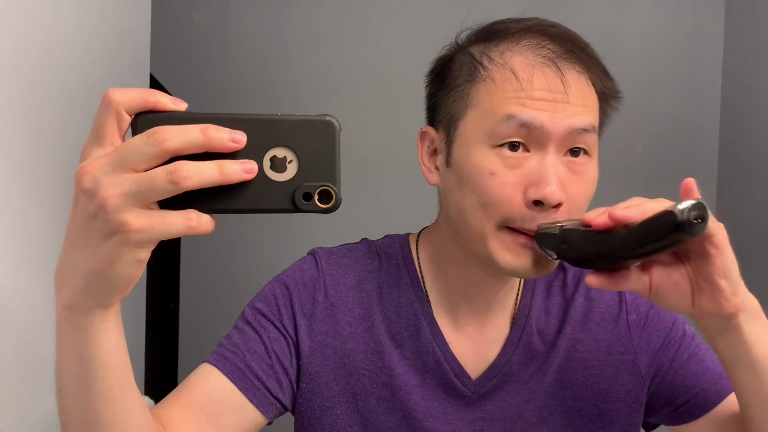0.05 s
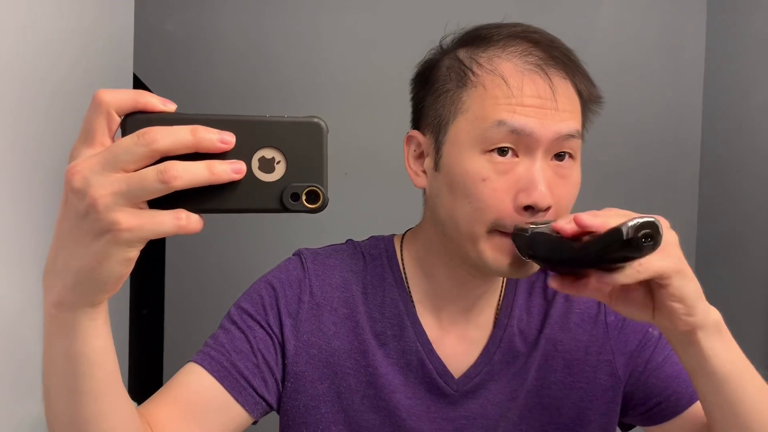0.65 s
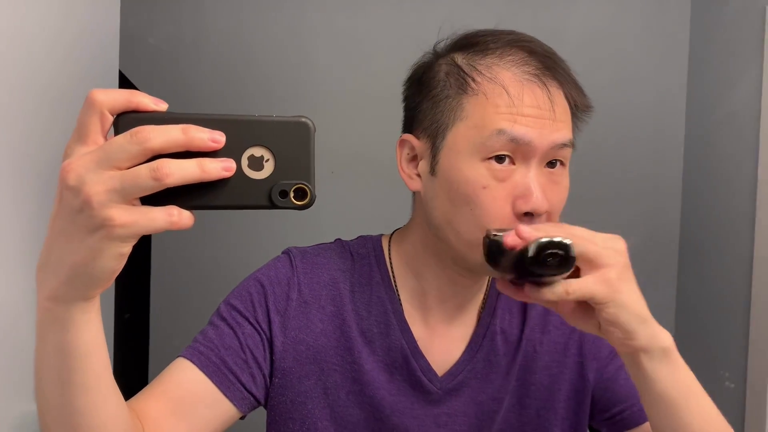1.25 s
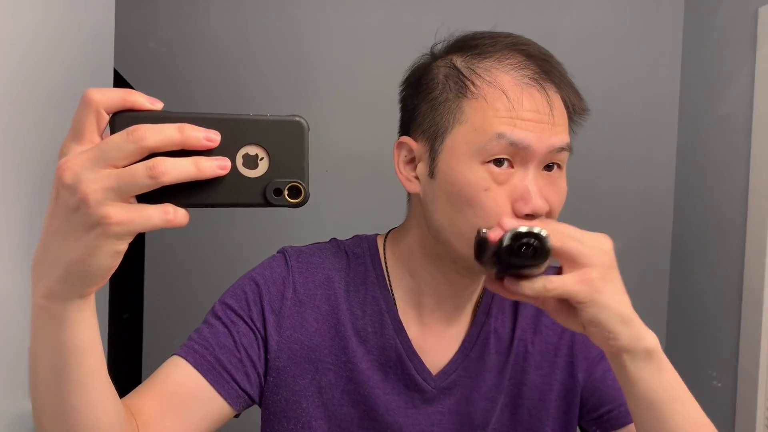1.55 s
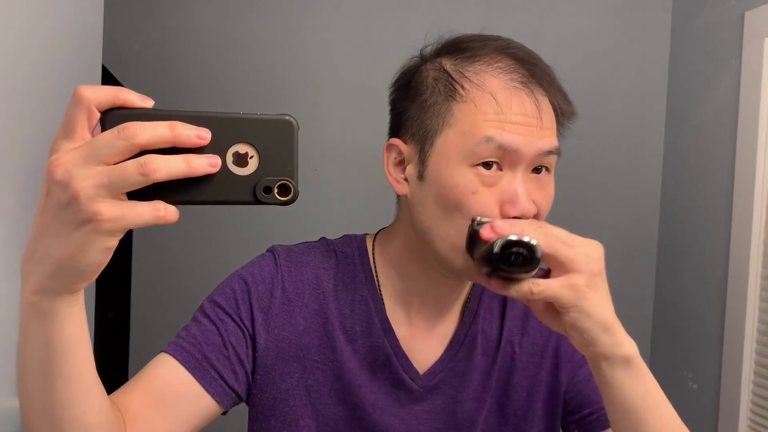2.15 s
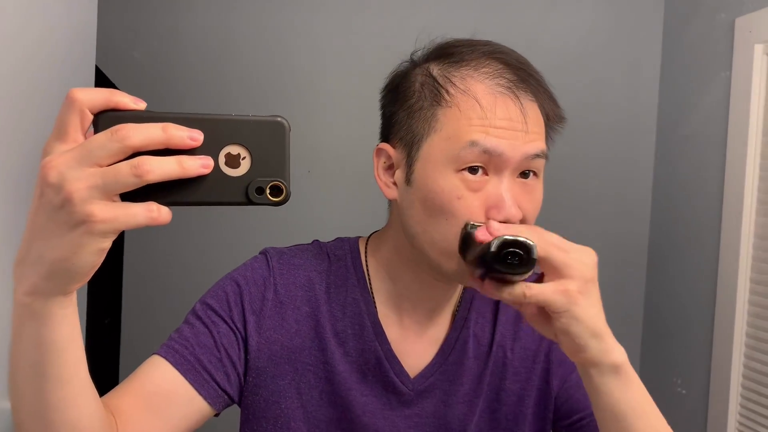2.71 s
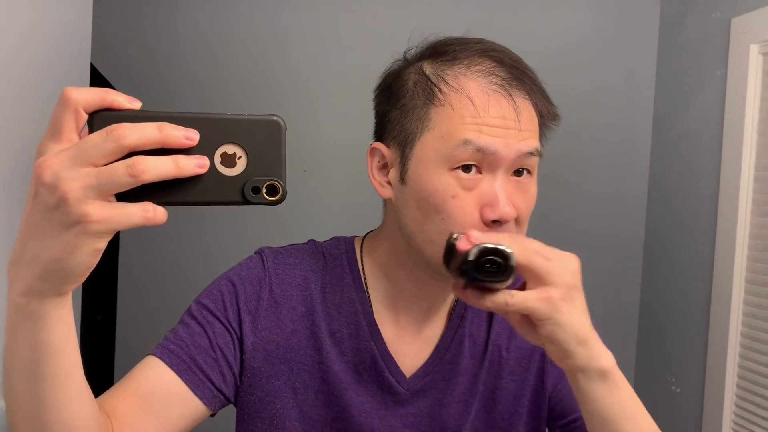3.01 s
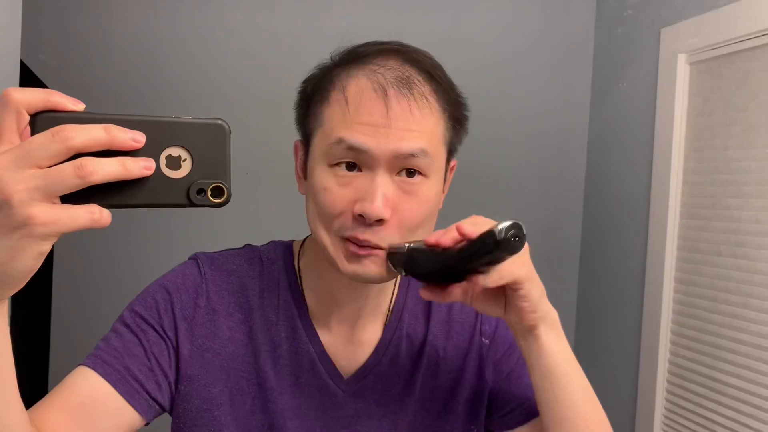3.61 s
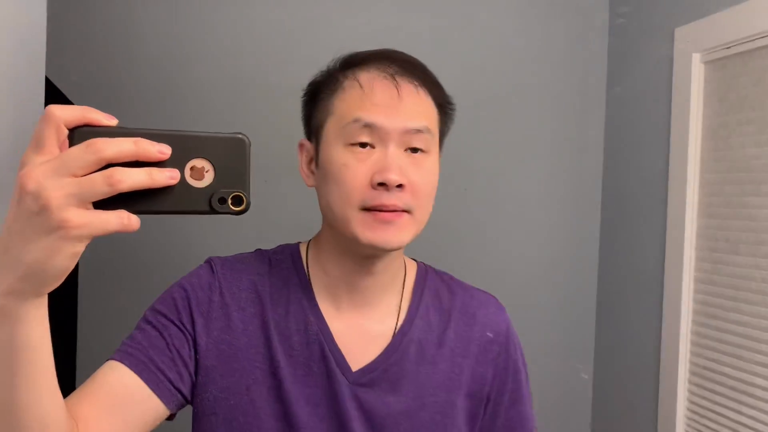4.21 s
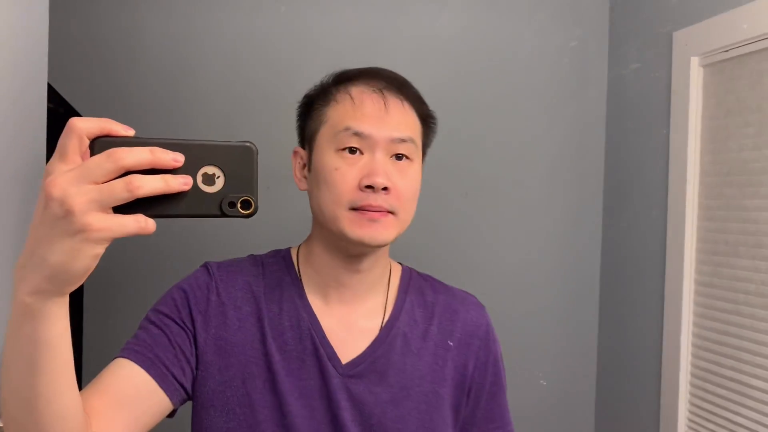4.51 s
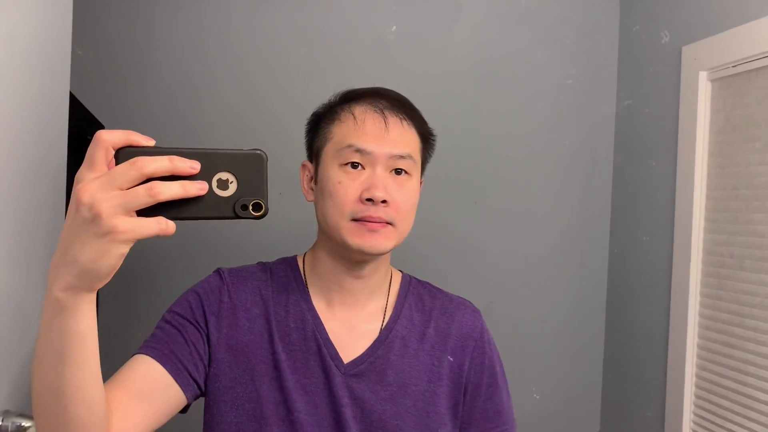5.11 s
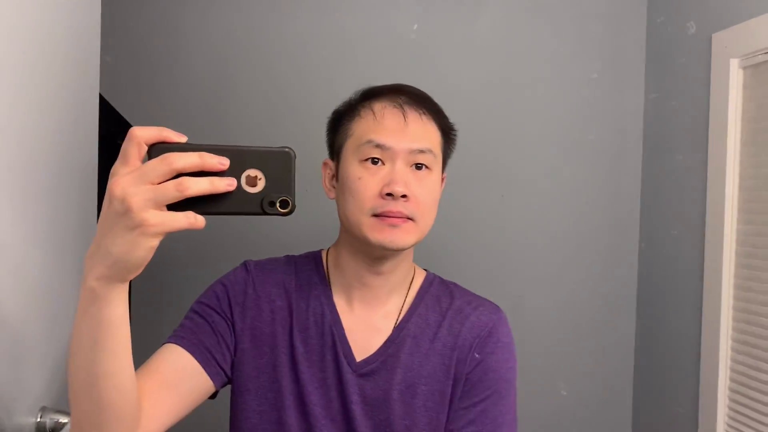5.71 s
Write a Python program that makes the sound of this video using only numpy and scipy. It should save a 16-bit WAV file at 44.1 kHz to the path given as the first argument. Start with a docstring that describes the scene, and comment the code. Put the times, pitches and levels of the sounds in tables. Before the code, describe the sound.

An electric shaver buzzes and rasps over stubble in a small bathroom, lifts to a cleaner buzz, then clicks off.

```python
"""In a small, hard-walled bathroom, an electric foil shaver is worked over stubble.
The carriage that carries the blades knocks each time it turns around. Pressed on the skin, the motor
slows, the foil (the thin metal screen over the blades) rasps and hairs snap. Lifted away, the shaver
buzzes cleanly, is switched off and runs down, leaving two soft scuffs and a low room rumble."""
import sys
import numpy as np
from scipy import signal
from scipy.fft import rfft, irfft, next_fast_len
from scipy.io import wavfile
from scipy.ndimage import uniform_filter1d

SR = 44100
rng = np.random.default_rng(int(sys.argv[2]) if len(sys.argv) > 2 else 0)


def put_to_file(sound):
    """Save the sound as 16-bit audio at rate SR, in the file named by the first command-line argument."""
    columns = np.atleast_2d(sound).T  # one column per channel
    safe = np.clip(columns, -1, 1)
    whole_steps = np.round(safe * 32767)
    wavfile.write(sys.argv[1], SR, whole_steps.astype(np.int16))


N = 253557
TIME = np.arange(N) / SR
FREE_HZ, RESTING_SAG_HZ = 115.7, 1.25   # blade cycles a second; "sag" is speed lost to drag
SWITCH_OFF_S, COAST_S = 4.888, .39
HOUSING_ORDER = 19   # the harmonic (multiple of the blade rate) that makes the housing sing

# Table levels are relative: the functions add their own offsets.
# "Mid" is what left and right share; "side" is how they differ; width is side minus mid.
# How firmly the foil lies on the skin: time_s, contact (0 to 1)
CONTACT = [(0, .9), (1.1, 1), (3.1, .95), (3.5, .8), (3.72, .85), (3.78, .2), (3.85, 0)]
# Strokes over the stubble: start_s, length_s, sag_hz, extra_snip_db, extra_rasp_db
STROKES = [(0.01, 0.12, 2.8, 4.5, -3), (0.194, 0.051, 2.17, 6.5, 0.5), (0.398, 0.1, 3.87, 8.5, 0.5),
           (0.582, .11, 2.65, 4, -0.5), (0.833, 0.06, 3.03, 6.5, -1), (0.99, 0.13, 5.76, 5.5, 0.5),
           (1.22, 0.16, 4, 1.5, 1.5), (1.468, 0.051, 5.2, 6.5, 3), (1.567, 0.0613, 1.11, 6.5, 2),
           (1.729, .19, 3.32, 7, 3), (2.099, 0.12, 2.4, 6.5, 2.5), (2.308, 0.17, 4.6, 5, 4),
           (2.578, 0.15, 4.43, 6.5, 3), (2.825, 0.069, 3.4, 8.5, 7), (3.051, 0.092, 2.3, 3, 3.5),
           (3.363, 0.095, 0.69, 4.5, 3), (3.568, 0.1, 5, -2, -5.5)]
# Levels between strokes, moving along the lip: time_s, rasp_db, snip_db, knock_db
ON_SKIN = [(0, -40, -47, -48.5), (.7, -38, -44.5, -45.5), (1.25, -33, -42.5, -40.5),
           (1.9, -34.5, -44.5, -52), (2.4, -36, -45.5, -48), (2.9, -38, -46.5, -48), (3.3, -37, -47, -44.5),
           (3.7, -39, -49.5, -76)]
# Levels as the shaver turns in the air: time_s, knock_db, sliding_db, whine_db, ticking_db
IN_AIR = [(3.79, -54, -34.5, -48, -51), (3.84, -41, -35, -46, -49), (3.89, -49, -38, -54, -47),
          (3.95, -48, -36, -47, -48), (4.01, -44, -42, -43.5, -48), (4.1, -43, -34.5, -48, -50),
          (4.16, -44.5, -49, -46, -50), (4.24, -40, -39, -43.5, -51), (4.38, -43, -45, -44.5, -50),
          (4.46, -47, -40, -39, -53), (4.55, -45, -48, -39, -55), (4.68, -58.5, -39.5, -38.5, -53.5),
          (4.87, -41, -48, -40.5, -54.5)]

# Hum of the swinging carriage: harmonic, pressed_db, lifted_db, lowered_db, lowered_width_db
HUM = [(2, -85, -74, -66, -10), (3, -75, -73, -68, -12), (4, -70, -73, -77, 4), (5, -62.5, -73, -68, 8),
       (6, -76, -65, -65, -10), (7, -66, -63, -58, -5), (8, -63.5, -69, -62, -7), (9, -61.5, -54, -59, -2),
       (10, -63, -61, -60, 1), (11, -60.5, -59, -71, 12), (12, -60, -57, -62, -2), (13, -69, -55, -62, -2),
       (14, -60, -56, -59, -2), (15, -59, -54, -53, -9), (16, -62, -56, -50, 7), (17, -55, -50, -51, 2),
       (18, -62, -54, -56, 5), (20, -64, -52, -48, 3), (21, -56, -50, -52, 4), (22, -62, -53, -56, 4),
       (23, -62, -52, -59, 7), (24, -60, -54, -59, 7), (25, -63, -58, -58, 6), (26, -63, -59, -57, 5),
       (30, -61, -59, -54, -5)]
# How well the skin passes on the hum, weak by the mouth and strong on the lip: time_s, gain_db
SKIN_COUPLING = [(0, -13.5), (.9, 2), (1.15, -0.5), (1.8, 4), (2.3, 5.5), (2.8, 2), (3.2, -2), (3.65, 3.5)]
# Swell of the free buzz, below and above the housing's resonance: time_s, below_db, above_db
BUZZ_SWELL = [(3.78, -1, 4), (3.84, 5, 1.5), (3.95, 5.5, 3.5), (4.02, 1.5, -8), (4.1, 3, 5),
              (4.18, -1.5, -6), (4.28, 7, -1.5), (4.35, 6.5, -4.5), (4.42, 6, -0.5), (4.5, 3.5, 1.5),
              (4.66, 1, -2), (4.87, 1.5, 2.5)]
# Tone colour of the carriage's knocks: pitch_hz, level_db
KNOCK_COLOUR = [(700, -16), (1100, -1.5), (1500, -16.5), (1800, -22.5), (2400, -3.5), (2800, -4),
                (3500, -2), (4500, -7), (7000, -21)]
# Resonances (pitches it likes to ring at) of the plastic housing: pitch_hz, width_hz, level_db
HOUSING_MODES = [(2171, 18, 8), (2230, 170, -8)]
# How loudly the housing rings: time_s, level_db
HOUSING_RING = [(0.0, -49.5), (0.27, -46), (0.34, -63), (0.87, -43.5), (1.02, -58), (1.05, -44),
                (1.15, -41), (1.18, -51), (1.5, -44.5), (1.6, -48), (1.66, -39), (1.76, -45.5),
                (1.9, -39.5), (2.06, -43.5), (2.11, -44.5), (2.15, -32.5), (2.26, -42), (2.32, -47),
                (2.37, -37), (2.4, -46.5), (2.45, -37.5), (2.54, -40.5), (2.6, -50.5), (2.67, -39),
                (2.8, -42), (2.86, -47.5), (3.0, -40.5), (3.06, -52), (3.1, -43.5), (3.26, -43),
                (3.31, -56), (3.37, -40.5), (3.42, -44), (3.5, -38), (3.56, -46), (3.6, -42), (3.67, -49),
                (3.76, -38), (3.85, -49), (3.9, -64), (3.98, -56), (4.1, -66), (4.3, -50), (4.41, -50.5),
                (4.54, -42), (4.87, -46.5)]

# Tone colour of the blades sliding freely: pitch_hz, level_db
SLIDE_COLOUR = [(2500, -17.5), (3400, -0.5), (3750, -5.5), (4400, 2.5), (5200, 4), (5600, 4), (6400, -4.5),
                (7500, -10), (8300, -4), (9200, -24), (13000, -23.5), (15500, -16.5)]
# Tone colour of the foil rasping on stubble: pitch_hz, level_db
RASP_COLOUR = [(300, -21), (600, -20.5), (1000, -17.5), (1400, -9.5), (1850, -7.5), (2150, -1.5),
               (2700, -1.5), (3100, -4), (3650, -16.5), (4300, -5.5), (5100, 0), (5500, -2.5), (6500, -1),
               (7500, -7), (9000, -13), (12000, -37)]
# Resonances of the foil in the air: pitch_hz, width_hz, level_db
BARE_FOIL_MODES = [(6340, 310, 10.5), (6180, 300, -4), (6910, 300, 5)]
# Resonance of the foil on the skin: pitch_hz, width_hz, level_db
PRESSED_FOIL_MODES = [(5060, 200, 10)]
# How loudly the foil rings against the stubble: time_s, level_db
FOIL_RING = [(0.0, -51.5), (0.97, -43), (1.01, -53.5), (1.13, -45.5), (1.16, -30.5), (1.19, -50.5),
             (1.29, -49.5), (1.32, -35.5), (1.39, -32.5), (1.43, -53), (1.52, -35.5), (1.56, -59),
             (1.6, -42), (1.74, -47), (1.8, -35.5), (1.95, -40), (2.15, -41), (2.23, -36), (2.37, -50.5),
             (2.39, -36), (2.56, -41), (2.58, -64), (2.71, -37.5), (2.81, -47.5), (2.95, -34.5),
             (2.99, -38), (3.16, -42.5), (3.22, -38), (3.27, -44), (3.32, -43.5), (3.45, -38), (3.52, -45),
             (3.58, -38), (3.67, -32), (3.81, -52), (3.85, -48)]
# Resonances of the foil's frame: pitch_hz, width_hz, level_db
FRAME_MODES = [(4253, 73, 3.5), (4430, 240, 6), (5760, 140, -2), (6460, 86, -8)]
# Tone colour of hairs being cut: pitch_hz, level_db
SNIP_COLOUR = [(7500, -11), (9500, -6), (10800, 5.5), (12000, 4.5), (13500, 4.5), (14600, -7), (15700, -10)]
# Thick hairs snapping: start_s, level_db
SNAPS = [(0.2134, -25), (0.4054, -26), (0.678, -25), (1.0214, -22), (1.1584, -21), (1.2647, -26),
         (1.3109, -18), (1.3638, -18), (1.5055, -19), (1.5878, -16), (1.607, -20), (1.636, -19),
         (1.671, -21), (1.7915, -22), (2.0514, -23), (2.1277, -22), (2.3324, -24), (2.4754, -20),
         (2.656, -22), (2.7079, -22), (2.8444, -23), (2.8945, -21), (3.101, -23), (3.4392, -22)]
# Clatters of the cutter head: start_s, length_s, level_db
CLATTERS = [(1.071, 0.062, -40.5), (1.481, 0.029, -36), (1.558, 0.047, -36.5), (1.853, 0.063, -41),
            (2.142, .06, -55), (2.348, 0.047, -40), (2.869, 0.042, -41)]
# Tone colour of the clatter: pitch_hz, level_db
CLATTER_COLOUR = [(900, -20.5), (1400, -7.5), (1750, 5), (2150, -1.5), (2600, 11.5), (3100, -3),
                  (4000, -27), (9000, -40)]

# Tone colour of the switch: pitch_hz, level_db
SWITCH_COLOUR = [(250, -1), (800, 4.5), (1500, 17.5), (2150, 23.5), (2900, 13), (5000, -5), (10000, -11)]
# Resonances that linger while the motor coasts: pitch_hz, width_hz, level_db
COAST_MODES = [(1138, 47, 0), (1673, 53, -14), (2015, 28, 12), (2460, 23, 4), (2590, 23, -5)]
# Scuffs of the silent shaver being handled: start_s, level_db, decay_s
SCUFFS = [(5.425, -68, 0.037), (5.485, -57.5, 0.02)]
# Tone colour of soft rubbing: pitch_hz, level_db
RUB_COLOUR = [(900, -30.5), (1250, 10.5), (1900, -5), (2800, 10), (4000, -1), (6000, 5), (7800, 4.5),
              (9500, -13), (15000, -7.5)]

# The hand creeps along the lip, then sweeps down: time_s, travelled_m
HAND_TRAVEL = [(0, 0.13), (1.2, 0.14), (3.5, 0.29), (3.75, 0.36), (4.35, 0.99), (4.9, 1.06)]
# How briskly the shaver sweeps past arm and chest: time_s, briskness (0 to 1)
SWEEP = [(3.7, 0), (3.85, 1), (4.3, 1), (4.48, 0)]
# Passing echoes off arm, shoulder and basin: detour_m, growth_m_per_m travelled, strength
ECHOES = [(.05, .45, .8), (1.1, -.7, -.6), (.2, .9, .45)]
# How long the bathroom takes to die away by 60 dB: pitch_hz, decay_s
ROOM_DECAY = [(200, .4), (1000, .45), (2200, .5), (6000, .41), (9000, .31), (15000, .22)]
# Stereo spread, as a boost or cut of the side signal: pitch_hz, gain_db
WIDTH = [(60, -16.5), (130, -11), (350, -2.5), (700, -3), (1300, 11.5), (2200, -3.5), (3000, 0), (4500, -2),
         (6200, 3.5), (8200, -1.5), (10000, -4), (12000, -67)]
# Tone colour of the ventilation rumble: pitch_hz, level_db
RUMBLE_COLOUR = [(25, -40.5), (45, -16), (70, -16), (110, -8.5), (135, -21), (180, -28.5), (260, -32),
                 (500, -41), (900, -61.5), (2000, -74.5)]
# How loud the rumble is: time_s, level_db
RUMBLE_LEVEL = [(0, -64.5), (1.1, -57.5), (1.8, -55.5), (2.7, -64), (4.6, -58.5), (5.75, -63.5)]
# Tone colour of the faint hiss: pitch_hz, level_db
HISS_COLOUR = [(500, -9), (3000, -11), (6200, -12), (7000, -3), (7600, 0), (8600, -8), (11000, -11),
               (15000, -11)]


def drive(turn, contact, knock_db):
    """The carriage's knocks shake the plastic body, and its loose linkage rattles and sets it ringing."""
    ring_db, = in_time(HOUSING_RING)
    clicks = knocks(turn, contact, second_at=.34, second_db=3.5, skin_jitter_s=6e-5, spread_db=3.5)
    clicks = disperse(rms_one(clicks), spread_s=.002)
    loose = rms_one(grains(turn, per_s=3600, spread_db=9, pulse_db=3.5))
    body = steady(colour(clicks + .25 * loose, KNOCK_COLOUR)) * from_db(knock_db - 4.5 + .34 * contact)
    shaking = clicks + .7 * contact * loose
    ring = steady(resonate(shaking, HOUSING_MODES), size=1500) * from_db(ring_db - .5)
    rattle = rms_one(resonate(loose, HOUSING_MODES)) * from_db(-52.5)
    return body + ring * np.sqrt(contact) + rattle * (1 - contact)


def blades(turn, contact, rasp_db, whine_db):
    """Free blades tick and make the foil whine; on stubble they rasp, and foil and frame ring."""
    foil_db, = in_time(FOIL_RING)
    ticks = knocks(turn + .18, contact, second_at=.42, second_db=.5, skin_jitter_s=4e-5, spread_db=1)
    ticks = disperse(rms_one(ticks), spread_s=.003)
    scrape = rms_one(grains(turn, per_s=4500, spread_db=3.9, pulse_db=2))
    rasp = steady(colour(scrape, RASP_COLOUR))
    sliding = ticks + .38 * scrape
    free = from_db(rasp_db - 4) * steady(colour(sliding, SLIDE_COLOUR))
    free += from_db(whine_db + 2) * steady(resonate(sliding, BARE_FOIL_MODES))
    free += from_db(-49) * rasp   # a little rubbing remains off the skin
    foil = steady(resonate(ticks + .53 * scrape, PRESSED_FOIL_MODES), size=1500)
    bites = grains(turn, per_s=900, spread_db=3.5, pulse_db=4)
    frame = steady(resonate(bites, FRAME_MODES))
    cutting = from_db(rasp_db - 2.5) * rasp + from_db(rasp_db - 9) * frame + from_db(foil_db - 1.5) * foil
    cutting *= from_db(2 * drift(55))   # the foil catches and slips on the skin
    return np.sqrt(1 - contact) * free + np.sqrt(contact) * cutting


def stubble(turn, contact, snip_db):
    """Hairs are cut in bright little clicks, in uneven clumps; thick ones give a short crackle."""
    clumps_db = 2.2 * contact * drift(70)
    cuts = grains(turn, per_s=8500, spread_db=6, pulse_db=-.5)
    snips = steady(colour(cuts, SNIP_COLOUR)) * from_db(snip_db + clumps_db)
    bursts = sum(from_db(db - 7) * (TIME >= s) * np.exp(-np.abs(TIME - s) / .005) for s, db in SNAPS)
    crackle = rms_one(grains(turn, per_s=7000, spread_db=2, pulse_db=0)) * bursts
    return snips + colour(crackle, SNIP_COLOUR) + 2 * resonate(crackle, PRESSED_FOIL_MODES)


def hum(turn, contact, speed, sag):
    """The carriage's clean tones swell and fade through the room's loud and quiet spots (mid, side)."""
    (travel,), (coupling_db,), (sweep,) = in_time(HAND_TRAVEL), in_time(SKIN_COUPLING), in_time(SWEEP)
    below_db, above_db = in_time(BUZZ_SWELL)
    lowered = np.clip((TIME - 4.27) / .13 + .5, 0, 1)   # passes below the chest at 4.27 s
    pressing_db = coupling_db + 2 * (sag - 2)
    depth_db = 1.2 + 3.5 * sweep + 1.3 * contact
    out = 0
    for order, pressed_db, lifted_db, lowered_db, side_db in HUM:
        phase, place = rng.random((2, 2, 1))
        wavelengths = order * speed * (travel * rng.uniform(.5, 1.2) / 343 + .025)
        fade_db = depth_db * np.sin(2 * np.pi * (wavelengths + place))
        fade_db += (1.2 + 2 * sweep + 2.8 * contact) * drift(18)
        fade_db += 2.5 * contact * (drift(7) - .2)
        wobble = (.022 + .008 * sweep + .085 * contact) * drift(55)
        swell_db = above_db if order > HOUSING_ORDER else below_db * (order >= 14)
        air_db = lifted_db - 2.3 + lowered * (lowered_db - lifted_db) + swell_db
        skin_db = pressed_db - 3.5 + pressing_db * 3.2 / order   # low tones feel the skin most
        air_width_db = 1 + lowered * (side_db - 1)
        width_db = contact * at_hz(WIDTH, order * FREE_HZ) + (1 - contact) * air_width_db
        level_db = contact * skin_db + (1 - contact) * air_db + fade_db + np.outer([0, 1], width_db)
        out += np.sqrt(2) * from_db(level_db) * np.sin(2 * np.pi * (order * turn + phase + wobble))
    return out


def housing_whine(turn, contact):
    """Off the skin, one harmonic sits on the housing's resonance and sings cleanly (mid, side)."""
    ring_db, = in_time(HOUSING_RING)
    level = np.sqrt(2 * (1 - contact)) * from_db(ring_db + np.array([[.3], [-3.5]]))
    return level * np.sin(2 * np.pi * (HOUSING_ORDER * turn + rng.random((2, 1))))


def clatter(turn):
    """Pushed hard, the cutter head clatters in its seat for a few cycles."""
    level = 0
    for start, length, db in CLATTERS:
        level += from_db(db) * np.clip(np.minimum(TIME - start, start + length - TIME) / .008, 0, 1)
    return level * steady(colour(grains(turn, per_s=3000, spread_db=2.5, pulse_db=1), CLATTER_COLOUR))


def strokes(attack_s, ease_s, release_s):
    """Sag, snip and rasp of the strokes: each rises, eases as the hairs are cleared, and lets go."""
    out = np.zeros((3, N))
    for start, length, *amounts in STROKES:
        span = slice(int(start * SR), int((start + .5) * SR))
        age = np.abs(TIME[span] - start)
        release = np.clip(1 - (age - length) / release_s, 0, 1)
        out[:, span] += np.outer(amounts, swell(age, attack_s, ease_s) * release)
    return out


def levels(contact):
    """Knock, rasp, whine and snip in dB: set by strokes on the skin, by the shaver's angle in the air."""
    _, snip_push, rasp_push = strokes(attack_s=.013, ease_s=.73, release_s=.023)
    rasp_push = delayed(rasp_push, .025)   # the rasp builds just after the first snips
    rasp, snip, knock = in_time(ON_SKIN)
    touching = np.clip(contact / .8, 0, 1)
    skin = np.array([knock + rasp_push, rasp + rasp_push, rasp - 20, snip + snip_push])
    return touching * skin + (1 - touching) * np.array(in_time(IN_AIR))


def knocks(turn, contact, second_at, second_db, skin_jitter_s, spread_db):
    """Two clicks a cycle, one at each turnaround; skin contact scatters their timing and strength."""
    chance = rng.standard_normal((1400, 2))
    k = np.arange(2 * int(turn[-1]))
    when = np.interp(k // 2 + k % 2 * second_at, turn, TIME)
    load = np.interp(when, TIME, contact)
    jitter_s = chance[k, 0] * (3.5e-6 + load * skin_jitter_s)
    at = np.clip((when + jitter_s) * SR, 0, N - 2)
    force = from_db(k % 2 * second_db + chance[k, 1] * (2 + spread_db * load))
    whole = at.astype(int)
    late = at - whole   # each click is shared between two samples
    return np.bincount(whole, force * (1 - late), N) + np.bincount(whole + 1, force * late, N)


def grains(turn, per_s, spread_db, pulse_db):
    """Tiny random clicks whose strength pulses as the cutting edges close, twice a cycle."""
    born = rng.random(N) < per_s / SR
    sizes = from_db(spread_db * np.minimum(rng.exponential(1, N), 4)) * rng.choice([-1, 1], N)
    pulse = np.cos(4 * np.pi * turn) + .67 * np.cos(2 * np.pi * turn) + .5 * np.cos(6 * np.pi * turn)
    return born * sizes * from_db(pulse_db * pulse)


def switch(attack_s=.015, decay_s=.056):
    """The switch slides over with a short, dull clack of the plastic body."""
    age = np.maximum(TIME - SWITCH_OFF_S, 0)
    burst = rng.standard_normal(N) * np.minimum(age / attack_s, 1) * np.exp(-age / decay_s)
    return from_db(-48) * colour(burst, SWITCH_COLOUR)


def run_down(turn, running):
    """The coasting blades rub ever more slowly, and the body rings on until they stop."""
    rubbing = grains(turn, per_s=11000, spread_db=2, pulse_db=-1)
    rub = from_db(-67.5) * rms_one(colour(rubbing, RUB_COLOUR))
    ring = from_db(-71) * rms_one(resonate(rubbing, COAST_MODES))
    return (rub + ring) * (TIME > SWITCH_OFF_S) * running ** .2


def scuffs(attack_s=.023):
    """Brief rubs on the plastic case: friction noise that swells and dies."""
    level = sum(from_db(db) * swell(TIME - start, attack_s, decay_s) for start, db, decay_s in SCUFFS)
    return colour(rng.standard_normal(N) * level, RUB_COLOUR)


def bathroom(x, wet_db):
    """Direct sound from the right, plus echoes that swirl and shift as the hand moves (mid, side)."""
    (travel,), (sweep,) = in_time(HAND_TRAVEL), in_time(SWEEP)
    lowered = np.clip(2 * travel - 1, 0, 1)
    paths = [(.41, .6 * lowered)]   # echo off the chest: detour_m, strength
    paths += [(detour_m + growth * travel, strength * sweep) for detour_m, growth, strength in ECHOES]
    echoes = sum(gain * delayed(x, metres / 343) for metres, gain in paths)   # sound covers 343 m/s
    x = (x + echoes) / np.sqrt(1 + sum(gain ** 2 for _, gain in paths))
    swing = 9 * travel + .5 * drift(3)
    wet = np.array([np.cos(swing) * reverb(x) + np.sin(swing) * reverb(x) for _ in range(2)])
    side = (delayed(x, .00042) - delayed(x, -.00042)) / np.sqrt(2)
    return (np.array([x, side]) + from_db(wet_db) * wet) / np.sqrt(1 + from_db(2 * wet_db))


def reverb(x):
    """Countless reflections off the hard walls; each band of pitches dies away at its own pace."""
    t = TIME[:SR * 3 // 4]
    noise, hz = rfft(rng.standard_normal(len(t))), np.fft.rfftfreq(len(t), 1 / SR)
    edges_hz = [0, 700, 1500, 3000, 5500, 8000, 11000, SR]
    tail = 0
    for low, high in zip(edges_hz, edges_hz[1:]):
        fade = from_db(-60 * t / at_hz(ROOM_DECAY, (low + high) / 2)) * (t > .003)
        band = irfft(noise * (hz >= low) * (hz < high), len(t))
        tail += band * fade / np.sqrt(np.sum(fade ** 2))
    return signal.oaconvolve(x, tail)[:N]


def rumble():
    """Low, throbbing ventilation noise under a faint steady hiss (mid, side)."""
    low = np.array([rms_one(colour(rng.standard_normal(N), RUMBLE_COLOUR)) for _ in range(2)])
    hiss = np.array([rms_one(colour(rng.standard_normal(N), HISS_COLOUR)) for _ in range(2)])
    throb_db = 2 * drift(30)
    level_db, = in_time(RUMBLE_LEVEL)
    return low * from_db(level_db + throb_db) + hiss * from_db(-79)


def disperse(x, spread_s):
    """Bending waves travel at different speeds, so a click is smeared over a few milliseconds."""
    size = next_fast_len(N + 1000)
    hz = np.fft.rfftfreq(size, 1 / SR)
    delay = spread_s * np.interp(hz, np.linspace(0, SR / 2, 60), rng.random(60))
    return irfft(rfft(x, size) * np.exp(-2j * np.pi * np.cumsum(delay) * hz[1]), size)[:N]


def colour(x, spectrum):
    """Give a sound the tone colour in a table, fading out below the table's lowest pitch."""
    size = 2 * next_fast_len(N // 2 + 4096)
    hz = np.arange(size // 2 + 1) * SR / size
    gain = from_db(at_hz(spectrum, hz)) * np.clip(hz / spectrum[0][0], .03, 1) ** 2
    # minimum phase: the filter rings after a click, never before it
    cepstrum = irfft(np.log(gain))
    cepstrum[1:size // 2] *= 2
    cepstrum[size // 2 + 1:] = 0
    return irfft(rfft(x, size) * np.exp(rfft(cepstrum)))[:N]


def resonate(x, modes):
    """Let a sound ring each resonance in a table, and add them up."""
    out = 0
    for hz, width, db in modes:
        r = np.exp(-np.pi * width / SR)
        feedback = [1, -2 * r * np.cos(2 * np.pi * hz / SR), r * r]
        out += from_db(db) * (1 - r * r) / 2 * signal.lfilter([1, 0, -1], feedback, x + 1e-18)
    return out


def steady(x, size=4000):
    """Hold the level near 1, averaged over `size` samples, keeping the fast grain."""
    power = uniform_filter1d(x ** 2, size)
    return x / np.sqrt(np.abs(power) + .01 * np.mean(x ** 2))


def swell(age, attack_s, decay_s):
    """Rise straight to 1, then die away."""
    return np.clip(age / attack_s, 0, 1) * np.exp(-np.maximum(age - attack_s, 0) / decay_s)


def drift(per_s):
    """Wander between random values, roughly 1 in size."""
    return np.interp(TIME * per_s, np.arange(4000), rng.standard_normal(4000))


def delayed(x, lag_s):
    """Shift a signal later in time."""
    return np.interp(TIME - lag_s, TIME, x)


def in_time(rows):
    """Read each column of a time table at every sample."""
    times, *columns = np.transpose(rows)
    return [np.interp(TIME, times, column) for column in columns]


def at_hz(points, hz):
    """Read a pitch table, with octaves evenly spaced."""
    pitches, values = np.transpose(points)
    return np.interp(np.log(hz + .0011), np.log(pitches), values)


def rms_one(x):
    """Scale to an average (rms) level of 1."""
    return x / np.sqrt(np.mean(x ** 2) + 1e-20)


def from_db(db):
    """Turn decibels into a multiplier."""
    return 10 ** (np.asarray(db) / 20)


def scene():
    """One motor drives all the shaver's moving parts; the room spreads them to left and right."""
    contact, = in_time(CONTACT)
    sag, _, _ = strokes(attack_s=.06, ease_s=.3, release_s=.08)
    running = np.clip(1 - (TIME - SWITCH_OFF_S) / COAST_S, 1e-6, 1)
    speed = (FREE_HZ - RESTING_SAG_HZ * contact - sag) * running
    flutter = (.0004 + .004 * contact) * drift(35)
    turn = np.cumsum(speed * (1 + flutter)) / SR   # blade cycles so far
    force = running ** 10.2   # the blows weaken steeply as the motor coasts
    knock_db, rasp_db, whine_db, snip_db = levels(contact)
    tone = force ** 2 * (hum(turn, contact, speed, sag) + housing_whine(turn, contact))
    tone += from_db(-9) * np.array([reverb(x) for x in tone])
    body = force * drive(turn, contact, knock_db) + clatter(turn)
    body += switch() + run_down(turn, running) + scuffs()
    shaver = bathroom(body, wet_db=-9)
    head = blades(turn, contact, rasp_db, whine_db) + force ** 2 * stubble(turn, contact, snip_db)
    shaver += bathroom(force * head, wet_db=1.5)
    mid, side = shaver + rumble()
    size = next_fast_len(N)
    side_gain = from_db(at_hz(WIDTH, np.fft.rfftfreq(size, 1 / SR)))
    side = irfft(rfft(side, size) * side_gain, size)[:N]
    mid, side = mid + tone[0], side + tone[1]
    return np.array([mid + side, mid - side])


def record(dry):
    """Cut the treble steeply above 15700 Hz."""
    return signal.sosfilt(signal.ellip(14, .05, 90, 15700, fs=SR, output="sos"), dry)


dry = scene()
out = record(dry)
put_to_file(out)
```